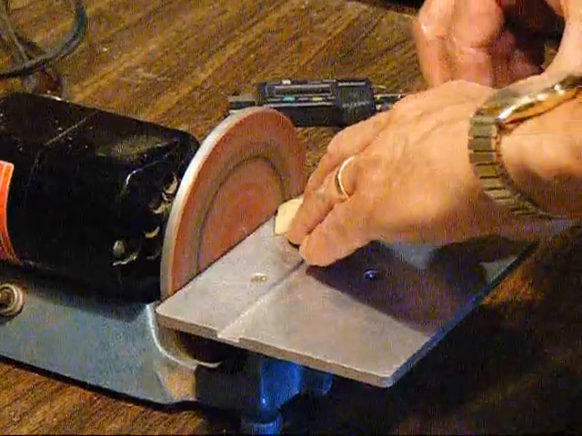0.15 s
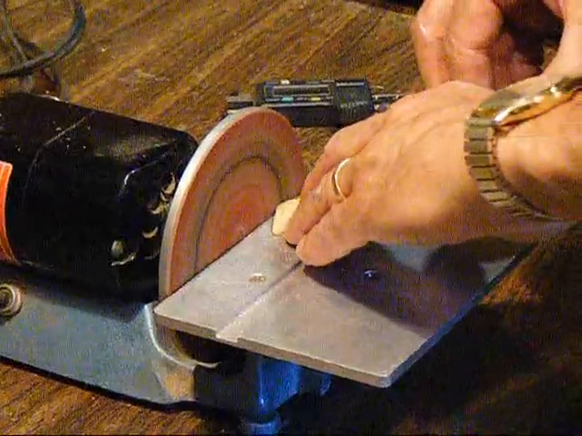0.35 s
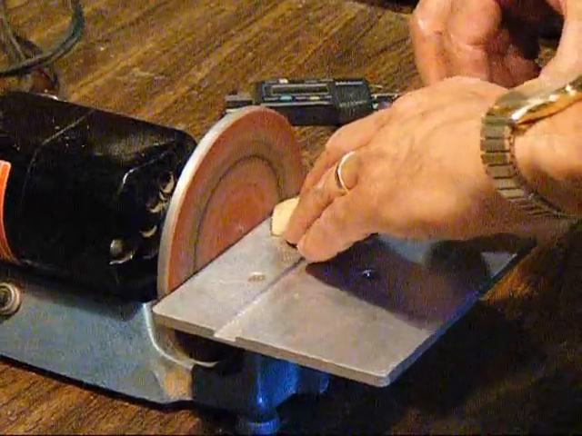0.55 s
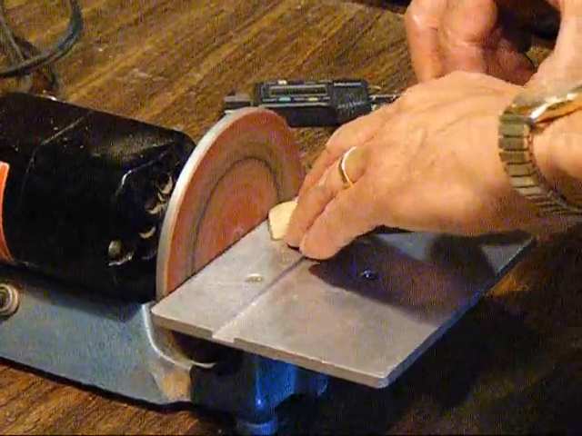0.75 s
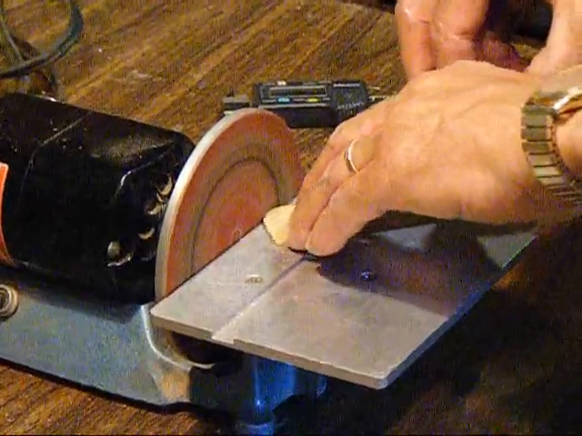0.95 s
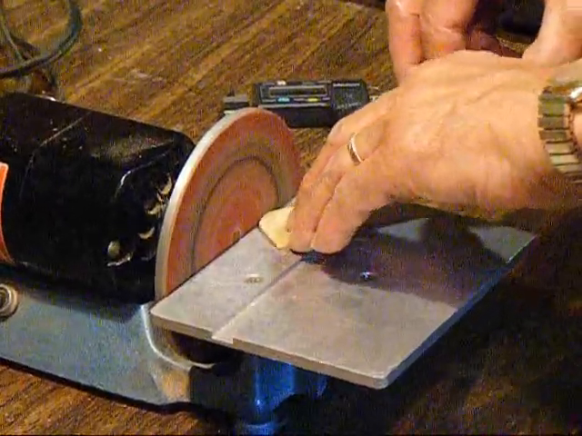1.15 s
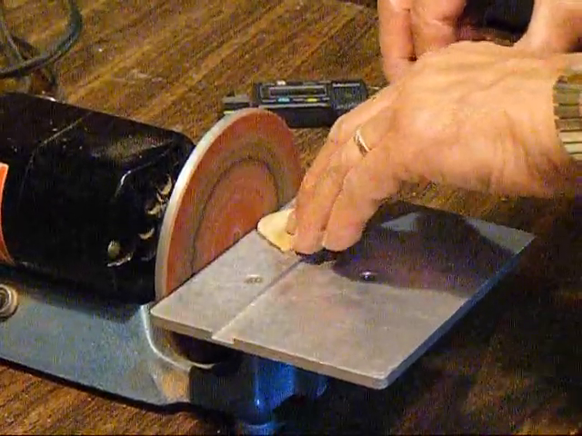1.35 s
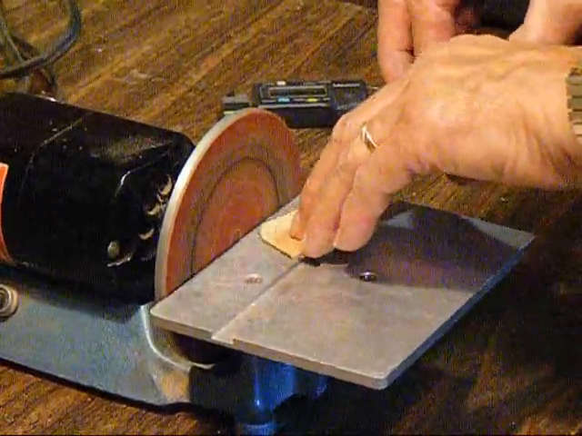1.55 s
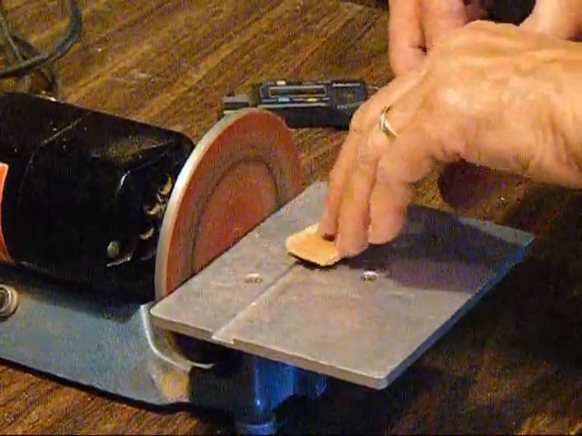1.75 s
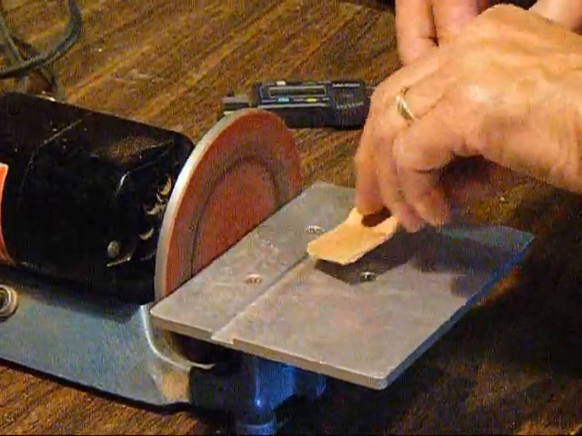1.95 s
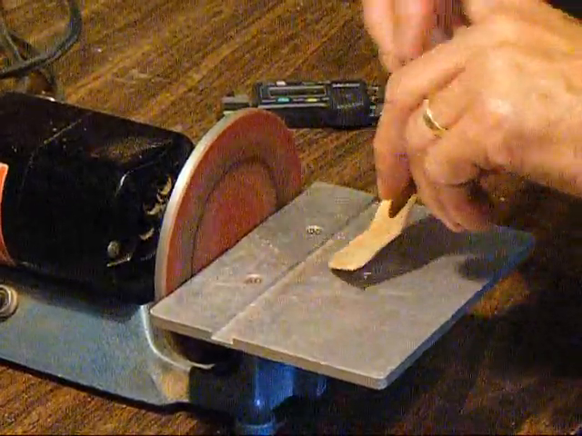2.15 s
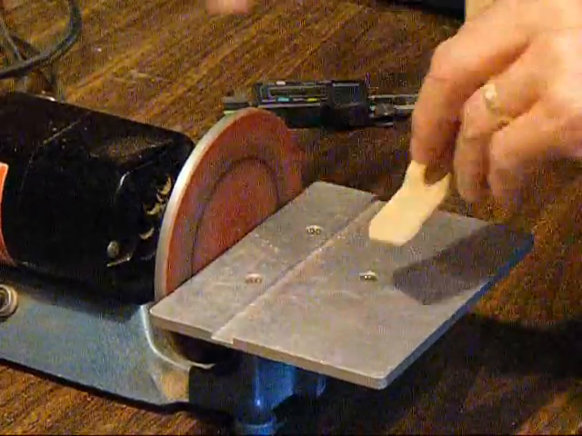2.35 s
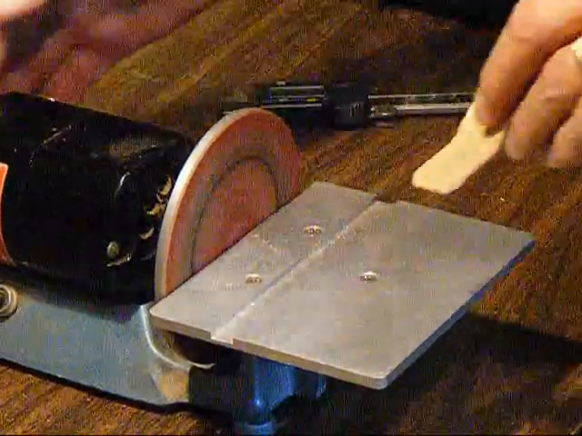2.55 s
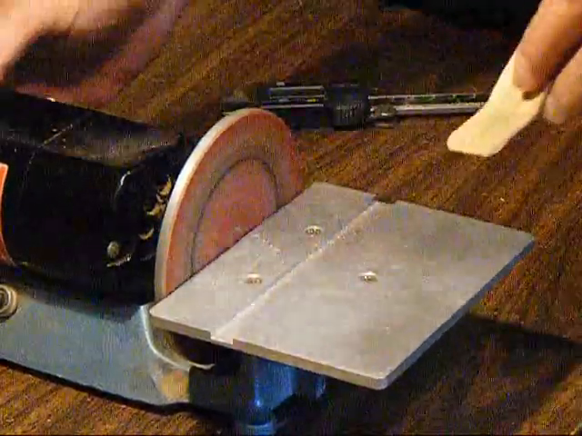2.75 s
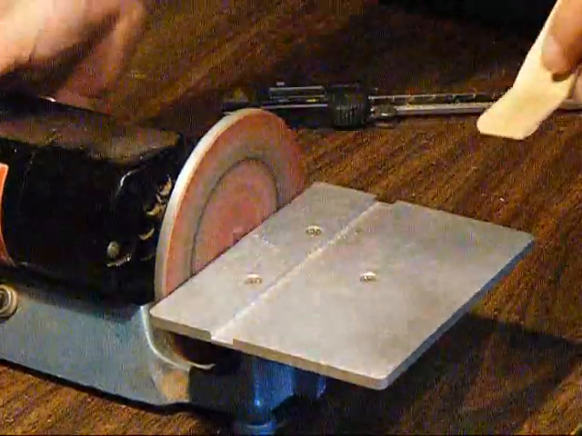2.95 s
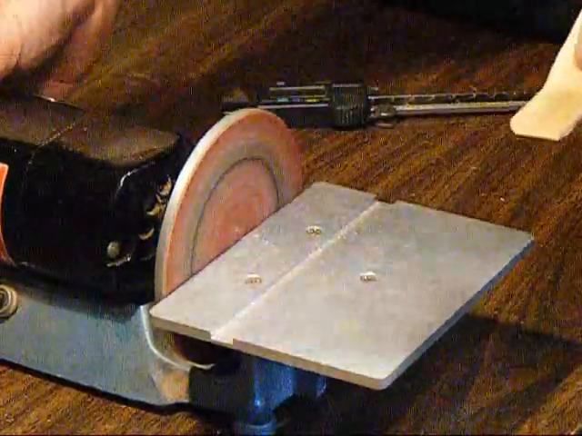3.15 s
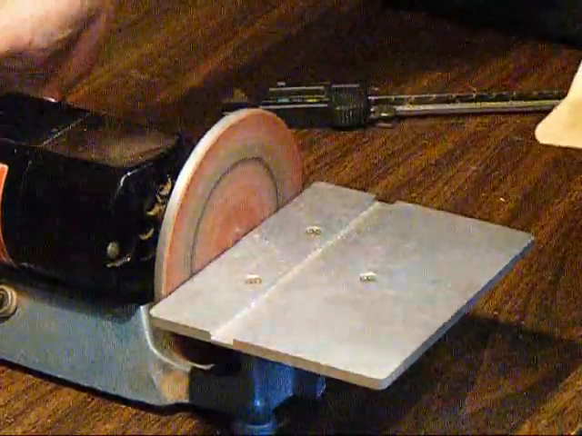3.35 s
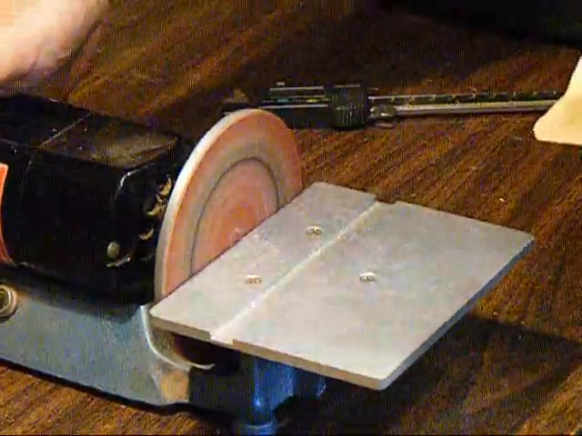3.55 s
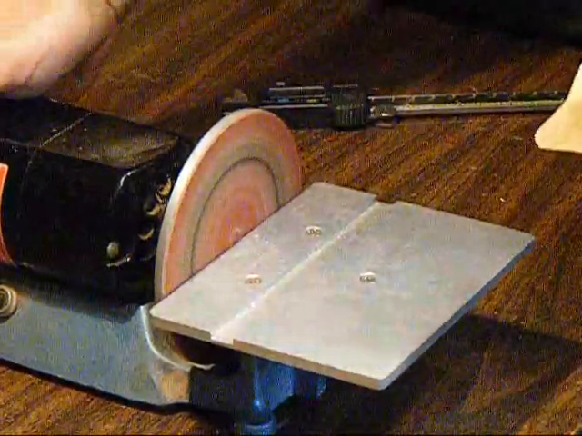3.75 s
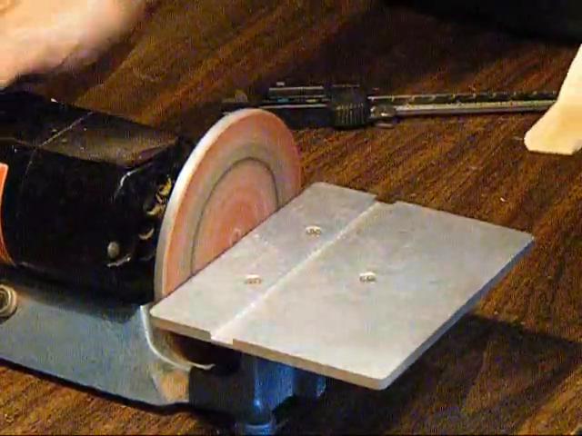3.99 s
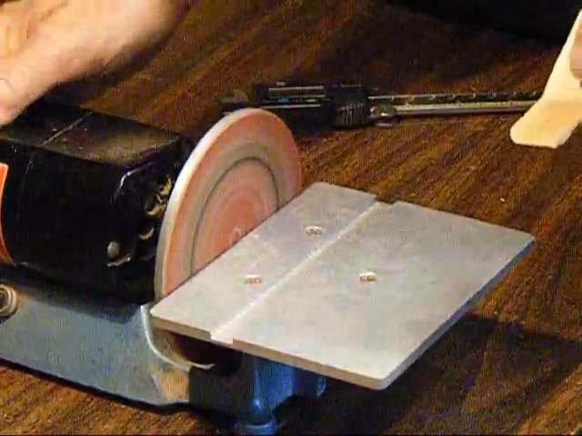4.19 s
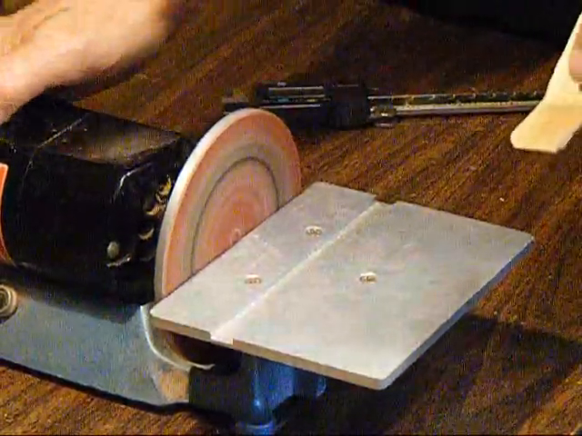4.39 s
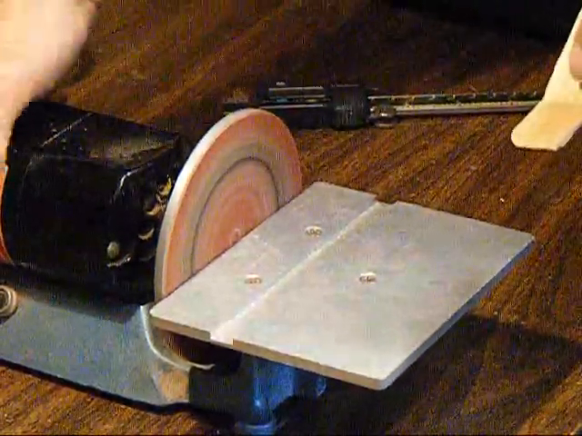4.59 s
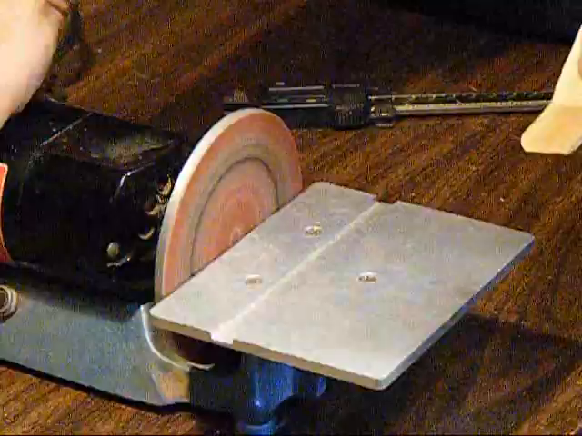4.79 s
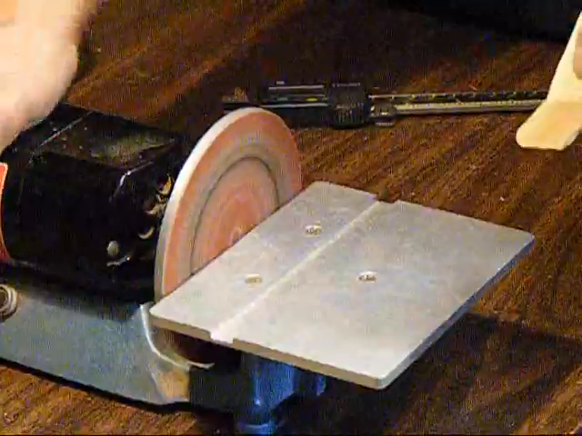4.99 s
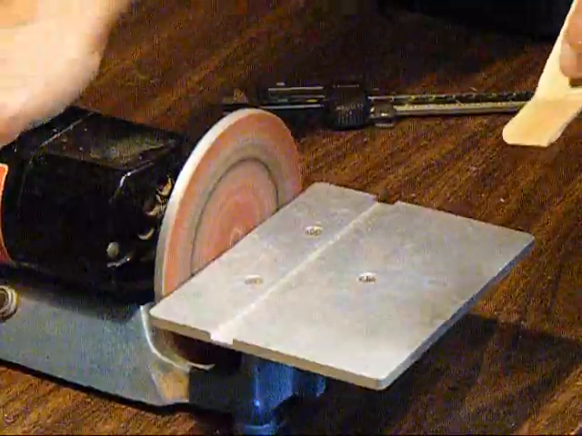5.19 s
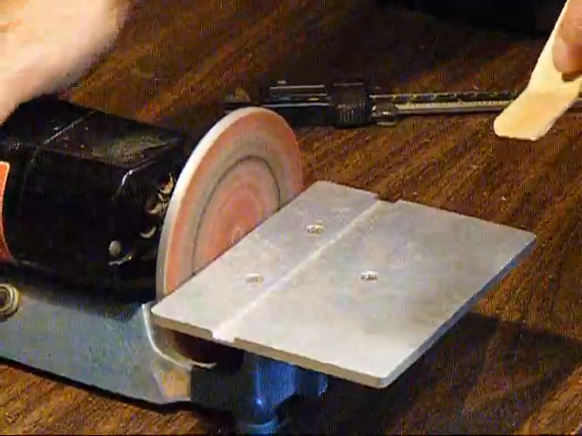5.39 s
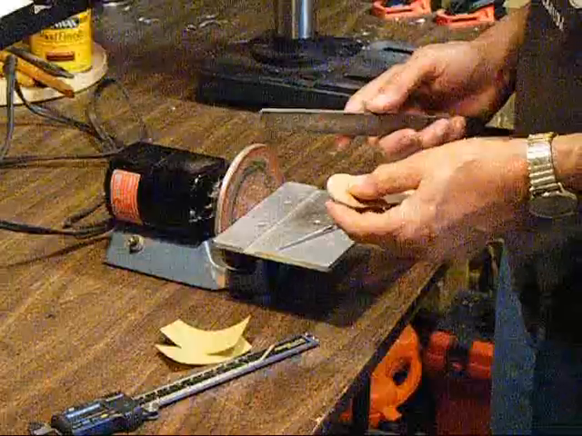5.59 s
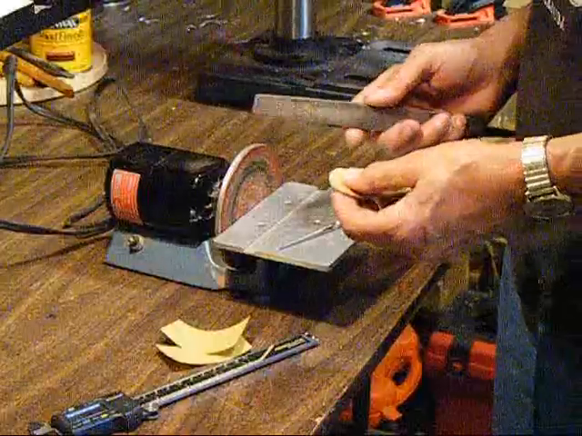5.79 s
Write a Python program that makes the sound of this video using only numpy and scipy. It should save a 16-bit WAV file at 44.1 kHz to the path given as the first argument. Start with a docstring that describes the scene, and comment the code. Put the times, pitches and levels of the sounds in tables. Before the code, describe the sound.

A small bench disc sander hums and rattles with wood pressed to it, speeds up as the wood lifts, then cuts off to a knock.

```python
"""In a workshop a small bench disc sander hums while wood is held to the disc; as the wood is eased off, the
motor speeds up. The rotor rattles once a turn: sines locked to its angle flare as they climb through narrow
frame resonances. Shaped noise makes the rush of disc and air and the scratch of the pressed wood; supply ripple
adds side tones. Then the scene changes abruptly: in a quiet room a hand tool knocks on wood, whose modes ring
as decaying sines. A coarse sampler that holds each value gives everything a glassy, mirrored treble."""
import sys
import numpy as np
from scipy import signal
from scipy.fft import rfft, irfft, next_fast_len
from scipy.io import wavfile

SR = 44100
rng = np.random.default_rng(int(sys.argv[2]) if len(sys.argv) > 2 else 0)


def store_wav(level_fs):
    """Save 16-bit WAV to argv[1]."""
    pcm = np.round(np.clip(np.atleast_2d(level_fs), -1, 1) * 32767)
    wavfile.write(sys.argv[1], SR, pcm.T.astype(np.int16))


N = 257103


def from_db(db):
    """Decibels to gain."""
    return 10 ** (np.asarray(db) / 20)


def rms_one(x):
    """Scale to unit rms."""
    return x / np.sqrt(np.mean(x ** 2) + 1e-20)


def seconds():
    """The time of every sample."""
    return np.arange(N) / SR


def white():
    """Fresh white noise of spread 1."""
    return rng.standard_normal(N)


def in_time(rows):
    """Each column of a curve, interpolated at every sample."""
    s, *columns = np.transpose(rows)
    return [np.interp(seconds(), s, column) for column in columns]


def drift(rate_hz):
    """Slow chance with spread 1: noise through two equal poles, drawn at every 40th sample."""
    step = 40
    pole = np.exp(-2 * np.pi * rate_hz * step / SR)
    settle = 2000   # let the filter settle before use
    noise = rng.standard_normal(N // step + 2 + settle)
    slow = signal.lfilter([1], [1, -2 * pole, pole ** 2], noise)[settle:]
    return np.interp(np.arange(N) / step, np.arange(len(slow)), rms_one(slow))


def coloured(x, spectrum):
    """Give a white signal a spectrum, interpolated over log frequency; rms 1."""
    hz, db = np.transpose(spectrum)
    size = next_fast_len(N)
    bins = np.maximum(np.fft.rfftfreq(size, 1 / SR), 1)
    gain = from_db(np.interp(np.log(bins), np.log(hz), db))
    return rms_one(irfft(rfft(x, size) * gain, size)[:N])


def tone(angle, db):
    """A sine of the given rms level."""
    return np.sqrt(2) * from_db(db) * np.cos(angle)


def bell(offset, half_width):
    """A rounded peak in dB: 0 at the centre, half the amplitude one half width away."""
    return 20 * np.log10(.5) * (offset / half_width) ** 2


def hum(angle, hum_db):
    """The unbalanced disc hums as one sine a turn."""
    return tone(angle, hum_db)


def supply_tones(angle, ripple):
    """The rectified supply's ripple hums and puts side tones around the commutator's overtones."""
    # Each row: multiple of the turn rate, multiple of the ripple, level in dB about which the tone wavers.
    ripple_tones = [(0, 1, -54), (1, 1, -58), (12, 1, -46), (12, 2, -52), (24, -2, -57), (24, -1, -62),
                    (24, 1, -63)]
    return sum(tone(k * angle + m * ripple, db + 1.7 * drift(4.8)) for k, m, db in ripple_tones)


def overtone_levels(speed, load, rattle_db, waver_db=1.0, loaded_waver_db=0.5):
    """Load sets each overtone's level; frame resonances lift those that meet them, and the shifting wood makes some flare."""
    # Overtones at full speed, with the wood just clear, easing off and pressed on.
    # Each row: multiple of the turn rate, level in dB against the rattle.
    free, eased, easing, pressed_on = [(2, -10), (3, -7), (4, -9), (5, -9), (6, -4), (7, -13), (9, -6),
                                       (10, -13), (11, -3), (12, -10), (16, -9), (19, -3), (20, -11),
                                       (21, -14), (22, -13), (23, -12), (24, -10), (25, -11), (26, -21),
                                       (28, -25), (29, -23), (30, -34), (31, -30)], [(2, -10), (3, -8), (4, -10), (5, -13), (6, -4),
                                                     (7, -11), (9, -12), (10, 0), (11, 2), (12, 0),
                                                     (16, -12), (19, -5), (20, -8), (21, -13), (22, -11),
                                                     (23, -9), (24, -13), (25, -13), (26, -12), (28, -22),
                                                     (29, -19), (30, -32), (31, -24)], [(2, -6), (3, -11), (4, -11), (5, -12),
                                                                    (6, -6), (7, -8), (9, -16), (10, -1),
                                                                    (11, -7), (12, 0), (16, -8), (19, -5),
                                                                    (20, -7), (21, -11), (22, -10),
                                                                    (23, -12), (24, -11), (25, -14),
                                                                    (26, -15), (28, -17), (29, -17),
                                                                    (30, -32), (31, -27)], [(2, -9), (3, -12),
                                                                                    (4, -11), (5, -14),
                                                                                    (6, -17), (7, -10),
                                                                                    (9, -11), (10, -15),
                                                                                    (11, -5), (12, -12),
                                                                                    (16, -11), (19, -9),
                                                                                    (20, -5), (21, -14),
                                                                                    (22, -11), (23, -19),
                                                                                    (24, -11), (25, -12),
                                                                                    (26, -20), (28, -23),
                                                                                    (29, -20), (30, -25),
                                                                                    (31, -28)]
    # Overtones the frame sings along with, away from its resonances.
    # Each row: multiple of the turn rate, level in dB against the rattle at full speed, the same pressed.
    singers = [(8, 2, -4), (13, -6, -6), (14, 1.5, -3), (15, -10, -6), (17, -14, -14), (18, -2.5, -9),
               (27, -12, -15)]
    # Narrow resonances of the frame.
    # Each row: centre in Hz, half width in Hz, an overtone's level at the centre in dB against the rattle.
    frame = [(1374, 6.8, 5), (2160, 17, 2), (2218, 10, 4.5), (2251, 11, 4), (2337, 26.4, 5.5),
             (2426, 11, 8.5), (2520.6, 20, 12), (2573.5, 20.6, 7), (2877, 38, 2), (2891, 9.9, 11.5),
             (2907, 16.3, 11), (2931, 7.1, 0.5), (3290, 17, -4)]
    # Single overtones that flare up as the wood shifts on the table.
    # Each row: peak in seconds, half width in seconds, pitch in Hz, level in dB.
    flares = [(.14, .08, 1310, -39), (.15, .07, 3115, -48), (.22, .06, 2460, -35.5),
              (.25, 0.18, 3285, -38.5), (.45, .18, 4445, -41.5), (.58, 0.18, 2965, -38),
              (.64, 0.046, 3625, -39), (.74, .05, 3130, -40), (.77, .06, 2140, -34.5),
              (.77, .06, 2470, -37), (.78, .06, 2965, -30.5), (.79, 0.08, 4445, -36),
              (1.15, 0.31, 4455, -41.5), (.83, 0.13, 3290, -37), (.9, .07, 2965, -35.5),
              (.96, 0.06, 1810, -37), (1.07, .05, 2140, -35), (1.08, 0.05, 2475, -31.5),
              (1.2, 0.058, 2975, -35), (1.21, 0.13, 2480, -30.5), (1.26, 0.084, 3640, -38.5),
              (1.27, 0.059, 2315, -34.5), (1.3, 0.19, 665, -44.5), (1.9, 0.088, 3195, -39.5)]

    levels = {}
    for rows in zip(free, eased, easing, pressed_on):
        orders, by_load = np.transpose(rows)
        levels[round(orders[0])] = np.interp(load, np.arange(len(rows)), by_load)
    for k, free_db, pressed_db in singers:
        levels[k] = free_db + (pressed_db - free_db) * load / load.max()

    for k in levels:
        # contact makes the overtones less steady
        db = levels[k] + (waver_db + loaded_waver_db * load) * drift(2.7)
        lowest_hz, highest_hz = k * speed.min(), k * speed.max()
        for hz, width_hz, peak_db in frame:
            if lowest_hz - width_hz < hz < highest_hz + width_hz:
                db = np.maximum(db, peak_db + bell(k * speed - hz, width_hz))
        levels[k] = rattle_db + db

    t = seconds()
    for s, width_s, hz, db in flares:
        k = round(hz / np.interp(s, t, speed))   # the overtone nearest that pitch
        levels[k] = np.maximum(levels[k], db + bell(t - s, width_s))
    return levels


def rattle(angle, load, levels, ripple, rough=0.018, loaded_rough=0.016, ripple_depth=0.02):
    """The same cluster of contacts comes round every turn and sets the overtones' phases; load roughens it."""
    contact_angles = rng.normal(0, 1.8, 40)   # radians
    contact_sizes = rng.standard_normal(len(contact_angles))
    unsteady = rough + loaded_rough * load
    shaken = angle + 0.028 * unsteady * drift(63)   # each turn's contacts come a little early or late
    overtones = np.zeros(N)
    for k, db in levels.items():
        lag = np.angle(np.sum(contact_sizes * np.exp(-1j * k * contact_angles)))
        overtones += tone(k * shaken + lag, db)
    torque_throb = ripple_depth * np.cos(ripple)   # the torque throbs with the supply
    return overtones * (1 + unsteady * drift(39) + torque_throb)


def rush(angle, load, grit_db=2.0, per_turn=0.057):
    """Grit and air hiss past the disc, swelling once a turn and flickering more under load."""
    # Rush of disc and air. Each row: frequency in Hz, relative level in dB per Hz.
    rush_spectrum = [(25, -12), (100, -10), (200, -5), (290, -13.5), (400, -12.5), (650, -3.5), (800, -5),
                     (1050, 1.5), (1350, -0.8), (1700, -3.5), (2300, 0.5), (2700, -5.5), (3100, -6.5),
                     (3600, -9), (4200, -16), (5000, -18.5), (5500, -16)]
    grains = white() * from_db(grit_db * drift(900))
    swell = 1 + per_turn * np.cos(angle)
    flicker = from_db((0.64 + 0.18 * load) * drift(15))
    return coloured(grains, rush_spectrum) * swell * flicker


def scratch(pressed, swing_db, level_db=-44.0, grit_db=4.0):
    """Grit scratches the pressed wood: grainy noise that follows the swing of the rush."""
    # Grit on wood. Each row: frequency in Hz, relative level in dB per Hz.
    scratch_spectrum = [(500, -25), (1800, -10), (3000, -6), (4400, -6), (5200, -8)]
    grains = white() * from_db(grit_db * drift(500))
    return pressed * from_db(level_db + swing_db) * coloured(grains, scratch_spectrum)


def sander(rush_gain_db=4.5, ripple_hz=120):
    """Hum, supply tones, rattle and rush share the rotor's angle; the pressed wood adds a scratch."""
    # Motor speed. Each row: time in seconds, turns per second.
    speed, = in_time([(0, 163.06), (.2, 164.05), (.4, 164.71), (.6, 164.76), (.8, 164.62), (1, 164.7),
                      (1.2, 165.24), (1.6, 167.08), (2, 168.65), (2.2, 169.4), (2.6, 170.38), (3, 171.09),
                      (3.6, 171.97), (4.4, 172.62), (5, 173.05), (5.6, 173.44)])
    # Pressure of the wood. Each row: time in seconds, load (3 pressed, 2 easing off, 1 just clear, 0 full speed).
    load, = in_time([(0, 3), (1.3, 3), (1.45, 2), (2.15, 2), (2.55, 1), (3.45, 1), (4.2, 0), (5.6, 0)])
    # Machine loudness. Each row: time in seconds, disc hum in dB, rush in dB before its gain.
    hum_db, rush_db = in_time([(0.0, -38, -43.5), (0.14, -34.5, -41.5), (0.29, -31.5, -40),
                               (0.52, -36.5, -44.5), (0.96, -30.5, -38), (1.11, -33, -41.5),
                               (1.47, -27.5, -38.5), (2.68, -27, -40), (2.71, -28.5, -42),
                               (2.86, -26.5, -39), (3.11, -25, -39.5), (3.2, -22.5, -37),
                               (3.33, -24, -40.5), (3.47, -24.5, -38.5), (4.06, -26.5, -42),
                               (4.33, -22, -37.5), (4.94, -26.5, -40.5), (5.03, -24.5, -38.5),
                               (5.08, -25.5, -40), (5.16, -27.5, -40.5), (5.31, -23.5, -39),
                               (5.56, -23.5, -38)])

    pressed = np.clip(load - 2, 0, 1)
    swing_db = rush_db - rush_db.mean()
    # the reference level of the rattle rises with pressure and follows part of the rush's swing
    rattle_db = -40.5 + 1.46 * pressed + 0.66 * swing_db
    angle = 2 * np.pi * np.cumsum(speed) / SR
    ripple = 2 * np.pi * ripple_hz * seconds()

    supply = supply_tones(angle, ripple)
    rotor = rattle(angle, load, overtone_levels(speed, load, rattle_db), ripple)
    air = from_db(rush_db + rush_gain_db) * rush(angle, load)
    return hum(angle, hum_db) + supply + rotor + air + scratch(pressed, swing_db)


def quiet_room_air(level_db=-43.0):
    """The quiet room is a steady bed of shaped noise."""
    # Air of the quiet room. Each row: frequency in Hz, relative level in dB per Hz.
    air_spectrum = [(30, -13), (58, -3), (110, -17), (190, -3), (400, -10.5), (800, -10.5), (1400, -15),
                    (2500, -17.5), (4000, -23), (5500, -24)]
    return from_db(level_db) * coloured(white(), air_spectrum)


def ring(force, hz, t60):
    """A two-pole resonator: a unit click sets a sine of height 1 ringing, down 60 dB after t60 seconds."""
    pole, turn = from_db(-60 / (t60 * SR)), 2 * np.pi * hz / SR
    # the tiny offset keeps the filter clear of very slow near-zero arithmetic
    return signal.lfilter([0, np.sin(turn)], [1, -2 * pole * np.cos(turn), pole ** 2], force + 1e-18)


def knock(contact_hz=3700, crack_db=0.5, crack_t60=0.023, tail_db=-23.5, tail_t60=0.1):
    """A hard contact with a bounce rings the wood's modes; a short noise crack and the room's tail follow."""
    # Contacts of the tool. Each row: time in seconds, strength in dB.
    contacts = [(5.595, -36), (5.6128, -24.5), (5.6137, -13), (5.6200, -34), (5.757, -44)]
    # Modes of the wood. Each row: pitch in Hz, level in dB against the contact, t60 in seconds.
    modes = [(87, -27, 0.22), (409, -16, 0.15), (573, -8, .06), (758, 3.5, 0.026), (886, -3.5, 0.074),
             (857, -22, 0.39), (1174, -26, 0.35), (1390, 4.5, 0.026), (1785, -4, 0.043), (1970, -5, .018),
             (2570, -9, .025), (2950, -6, 0.021), (3600, -28, .02)]
    # Dull tail of a knock. Each row: frequency in Hz, relative level in dB per Hz.
    tail_spectrum = [(100, -7), (400, 1), (850, 3), (1500, -1), (2200, -15), (3500, -11), (4200, -30)]

    t, force, crack = seconds(), np.zeros(N), np.zeros(N)
    for s, db in contacts:
        force[round(s * SR)] += from_db(db)
        crack += (t >= s) * from_db(db + crack_db - 60 * np.abs(t - s) / crack_t60)

    body = np.zeros(N)
    for k, (hz, db, t60) in enumerate(modes):
        body += (-1) ** k * from_db(db) * ring(force, hz, t60)   # neighbours swing opposite ways
    contact_filter = signal.cheby1(10, 1, contact_hz, fs=SR, output="sos")
    direct = signal.sosfilt(contact_filter, body + crack * white())

    since = t - np.argmax(force) / SR   # seconds after the strongest contact
    fade = (since > 0) * from_db(tail_db - 60 * np.abs(since) / tail_t60)
    return direct + fade * coloured(white(), tail_spectrum)


def scene(stop_s=5.582):
    """Within a millisecond the scene changes from the running sander to a quiet room and its knocks."""
    running = np.clip((stop_s - seconds()) * 1000, 0, 1)
    mix = running * sander() + (1 - running) * quiet_room_air() + knock()
    return mix[None]


def record(dry, hold=4, narrow_hz=5600, cutoff_hz=15750):
    """The sampler holds each value for four samples, mirroring the sound into a glassy treble; it sits slightly off zero."""
    narrow = signal.sosfilt(signal.butter(12, narrow_hz, fs=SR, output="sos"), dry)
    held = np.repeat(narrow[:, ::hold], hold, axis=1)[:, :N]
    smooth = signal.sosfilt(signal.ellip(12, .1, 80, cutoff_hz, fs=SR, output="sos"), held)
    return smooth - .012


dry = scene()
out = record(dry)
store_wav(out)
```